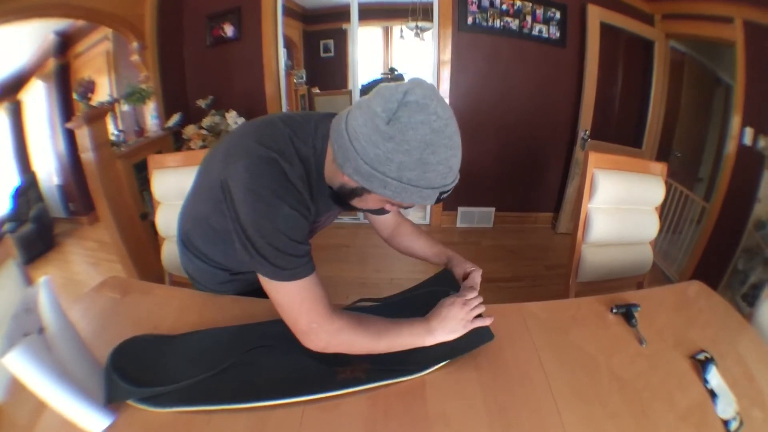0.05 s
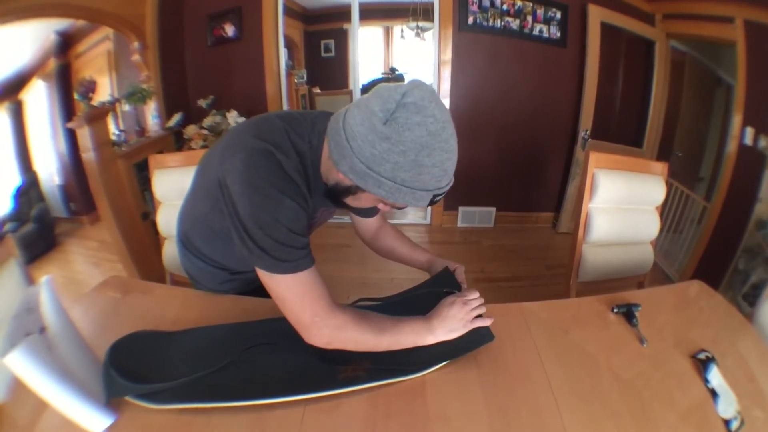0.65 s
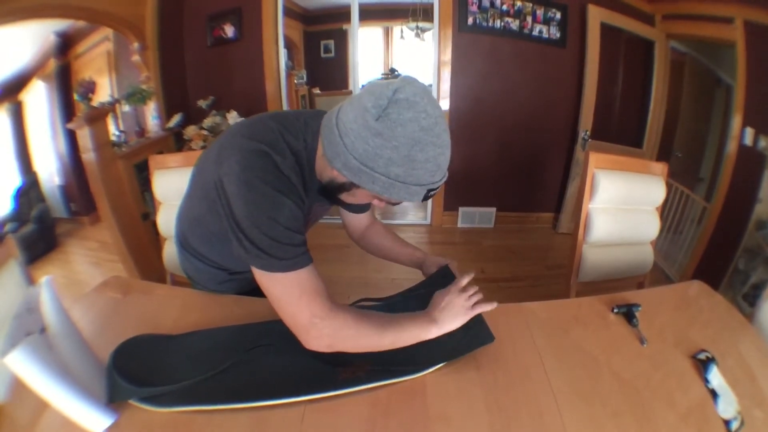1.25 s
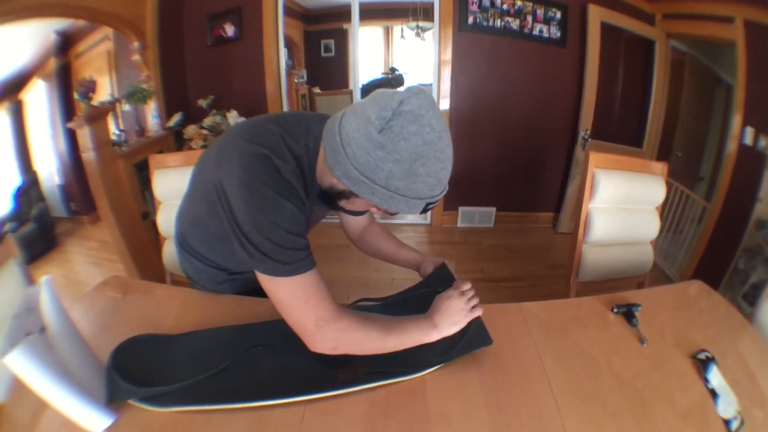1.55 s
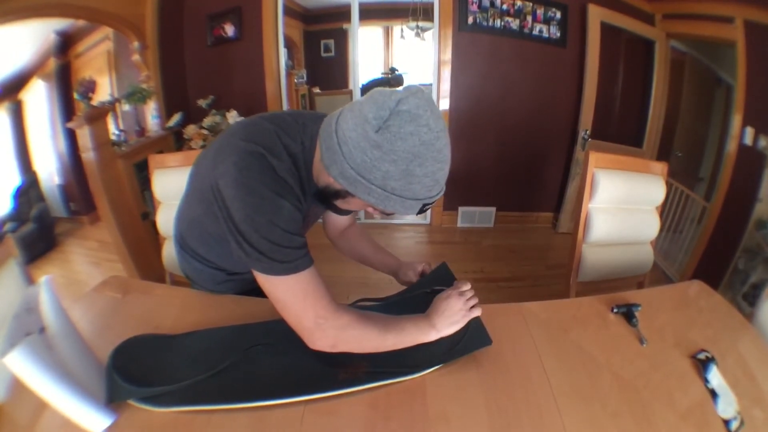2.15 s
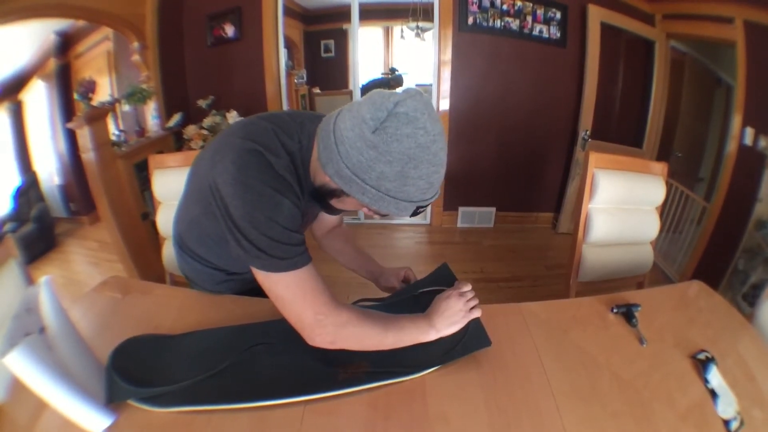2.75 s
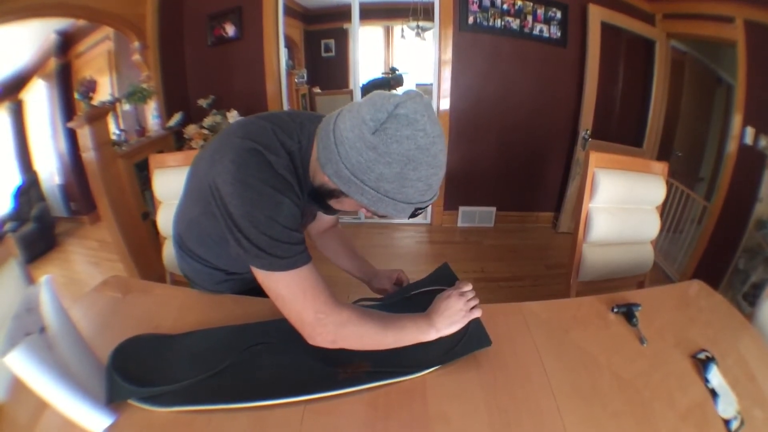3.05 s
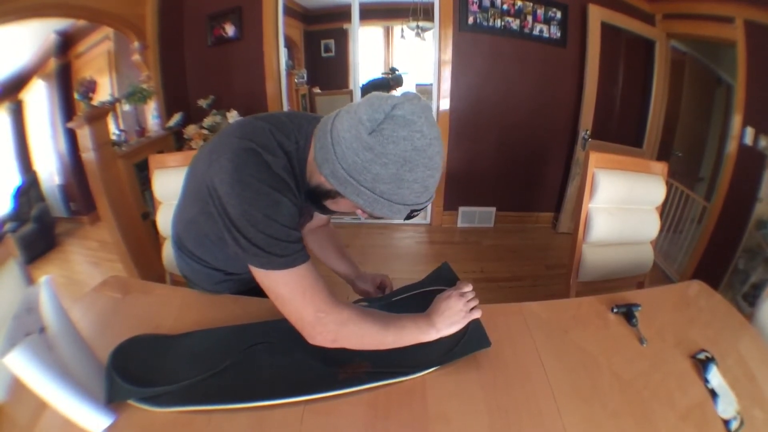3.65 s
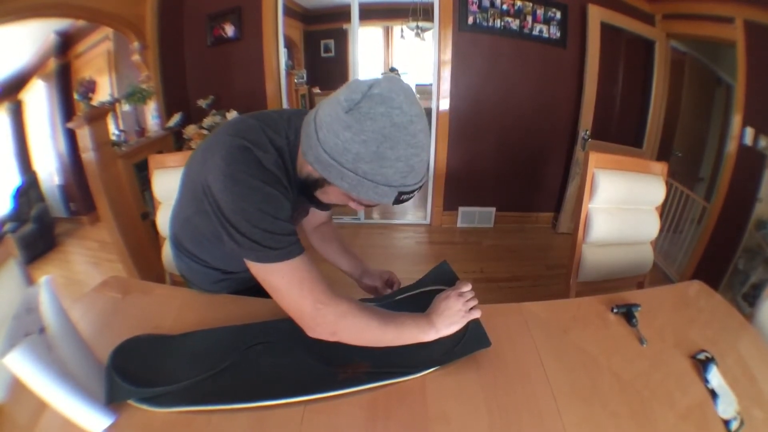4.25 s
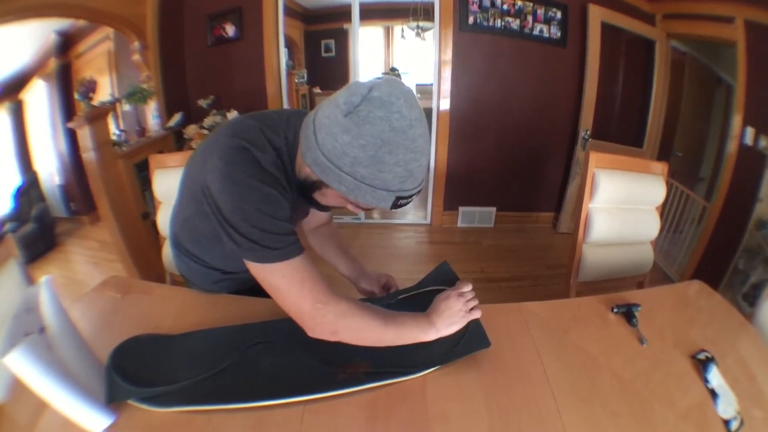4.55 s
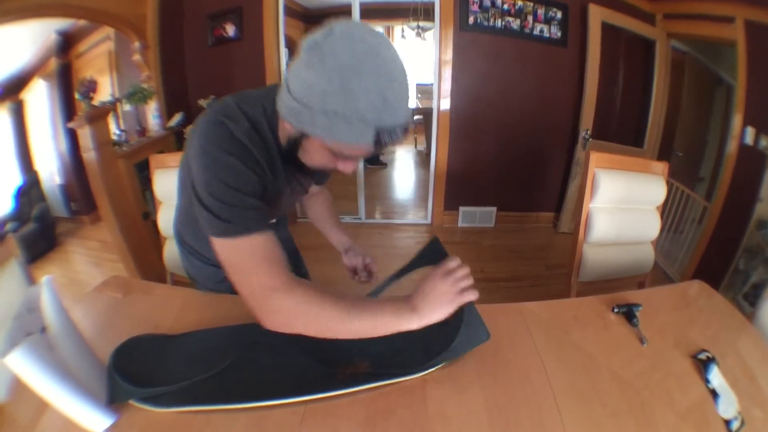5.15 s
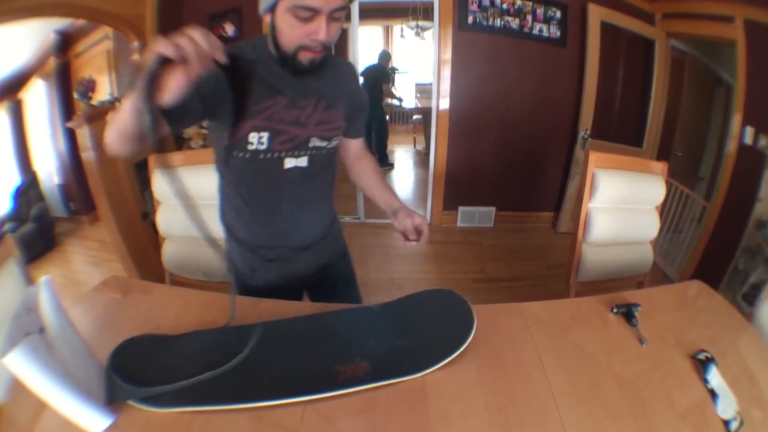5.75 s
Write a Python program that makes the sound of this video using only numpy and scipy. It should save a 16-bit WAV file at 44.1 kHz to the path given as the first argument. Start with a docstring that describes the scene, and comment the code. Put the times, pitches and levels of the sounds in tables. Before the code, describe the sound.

In a reverberant wooden room, a nearby microphone picks up the jerky, gritty rasp of a blade trimming tape from a skateboard. One loud, ringing knock of the board on the table interrupts early on. More scraping strokes follow, with light clicks as the blade catches. After a lull comes a short tear, then a few crisp snaps of the loose strip and soft bumps on the board, over faint hiss.

```python
"""Gritty clicks and a rasp: a utility blade saws the overhanging grip tape off a skateboard deck.
Grit fractures under the edge in stick-slip jerks and drives the deck into a hum. Once the deck tips
and knocks on the wooden table, and both ring in their modes; later, hands bump it softly.
The last of the tape rips, then the stiff offcut snaps free and flicks about.
A live wooden room reverberates, over a faint rumble and hiss."""
import sys
import numpy as np
from scipy import signal
from scipy.fft import rfft, irfft
from scipy.io import wavfile

SR = 44100
rng = np.random.default_rng(int(sys.argv[2]) if len(sys.argv) > 2 else 0)


def pcm_store(signal):
    """Save signal as 16-bit PCM."""
    levels = np.round(np.clip(np.atleast_2d(signal), -1, 1) * 32767)
    wavfile.write(sys.argv[1], SR, levels.astype(np.int16).T)


N = 260851
TIME = np.arange(N) / SR
SIZE = 4096  # samples in a click response

# spectra of breaking grit, hollow plywood and the tape's tick: (frequency [Hz], level [dB])
GRIT_SPECTRUM = [(700, -43.5), (1300, -12.5), (1650, 0), (1900, 2), (2250, -1.5), (2500, -6), (3100, -9.5),
                 (3700, -8.5), (4600, -30), (7000, -53), (15000, -63)]
PLYWOOD_SPECTRUM = [(300, -23.5), (720, -9), (900, -6.5), (1010, 3.5), (1220, 0), (1400, -4.5),
                    (1650, -5.5), (2500, -42.5)]
TICK_SPECTRUM = [(1000, -7.5), (3000, 0), (4500, -2), (6000, -7.5), (8000, -15), (12000, -20), (16000, -22)]
# resonances of blade and board: (frequency [Hz], level [dB], T60 [s])
EDGE_MODES = [(1017, -6.5, 0.08), (1374, -15, .09), (1958, 4, 0.072), (2198, -5.5, 0.27),
              (2640, -0.5, 0.025), (3866, -6, 0.027), (6340, -18.5, 0.018)]
# pushes of the blade; the last three levels are relative to the rasp:
# (start [s], duration [s], rasp [dB], change over the push [dB], bite [dB], plywood [dB], hum [dB])
PUSHES = [(0.171, 0.072, -57, -4, -6.5, -3.5, 0), (0.283, 0.22, -59.5, -6.5, -10.5, -4, -2),
          (0.509, 0.175, -54.5, 0, -3, -1, -1), (0.702, 0.097, -57.5, -5, -14, 1, -0.5),
          (0.844, 0.27, -59.5, 0, -9, -1, -3.5), (1.591, 0.19, -51.5, 4.5, -6, -6.5, -13.5),
          (1.801, 0.15, -54, -14, -9, -11, -6), (1.931, 0.294, -48.5, -1.5, -10, -12, -17),
          (2.229, 0.22, -49.5, 5, -13, -12, -12.5), (2.47, 0.12, -61.5, -4, -5.5, -11.5, -9),
          (2.605, 0.25, -50, 2, -12.5, -9.5, -12), (2.874, 0.15, -58.5, 13, -10, -14, -17),
          (3.014, 0.15, -47, 0, -8.5, -10, -8), (3.322, 0.14, -49, -3, -10, -10, -15.5),
          (3.461, 0.24, -52.5, 0.5, -15, -20.5, -14), (3.65, 0.17, -54.5, 12, -2, -13.5, -8),
          (4.407, 0.13, -60.5, -5, -8.5, -7, -16)]


def amp(db):
    """Amplitude ratio: a factor of ten per 20 dB."""
    return 10 ** (np.asarray(db) / 20)


def unit(x):
    """Normalisation to an rms of 1."""
    return x / np.sqrt(np.mean(x ** 2))


def through(x, response):
    """Convolution: a linear system answers each sample with its impulse response."""
    return signal.fftconvolve(x, response)[:N]


def on_log(hz, points):
    """Interpolation of (frequency [Hz], value) points on a logarithmic frequency axis."""
    frequencies, values = np.transpose(points)
    return np.interp(np.log(hz + 1), np.log(frequencies), values)


def pulse(spectrum, lag_s=0):
    """Dispersion of a click (peak 1): bending waves carry treble fastest; 1 kHz is delayed by lag_s."""
    hz = np.fft.rfftfreq(SIZE, 1 / SR)
    cepstrum = irfft(np.log(amp(on_log(hz, spectrum))))
    cepstrum[1:SIZE // 2] *= 2  # folding the cepstrum gives minimum phase
    cepstrum[SIZE // 2 + 1:] = 0
    bending_phase = 4 * np.pi * lag_s * np.sqrt(1000 * hz)
    click = irfft(np.exp(rfft(cepstrum) - 1j * bending_phase))
    return click / np.abs(click).max()


def ring(modes):
    """Modal superposition: one second of damped sines of alternating sign."""
    t = TIME[:SR]
    return sum((-1) ** k * amp(db) * np.sin(2 * np.pi * hz * t) * np.exp(-np.log(1000) * t / t60)
               for k, (hz, db, t60) in enumerate(modes))


def ringing(spectrum, modes, ring_db):
    """Impact response: a click plus free vibration, whose energy is ring_db relative to the click."""
    click = np.pad(pulse(spectrum), (0, SR - SIZE))
    tone = ring(modes)
    return click + amp(ring_db) * tone * np.sqrt(np.sum(click ** 2) / np.sum(tone ** 2))


def impulses(table, column=1):
    """Ideal impacts: one impulse at each row's time, at the level [dB] in the chosen column."""
    rows, train = np.array(table), np.zeros(N)
    samples = np.clip(np.round(rows[:, 0] * SR).astype(int), 0, N - 1)
    np.add.at(train, samples, amp(rows[:, column]))
    return train


def pitched_clicks(rows, spectrum, lag_s):
    """Frequency scaling: one spectrum, shifted for each (time [s], level [dB], pitch [Hz])."""
    return sum(through(impulses([(s, db)]), pulse([(hz * k, gain) for k, gain in spectrum], lag_s))
               for s, db, hz in rows)


def crumble(x, decay_s, tail_db):
    """Crumbling contact: a decaying noise burst follows each impulse."""
    fade = np.exp(-TIME[:SIZE] / decay_s)
    envelope = through(x, fade / np.sqrt(np.sum(fade ** 2)))
    return x + amp(tail_db) * envelope * rng.standard_normal(N)


def grit(per_s, spread_db):
    """Brittle fracture as a Poisson process: grains break independently, at scattered levels."""
    breaks = rng.random(N) < per_s / SR
    sizes = np.minimum(rng.exponential(size=N), 4)
    return breaks * amp(spread_db * sizes) * rng.choice([-1, 1], N)


def room(x, wet_db):
    """Reverberation: direct sound plus a diffuse tail whose treble dies first."""
    decay_times = [(100, 0.67), (400, 0.64), (2000, 0.53), (4000, 0.49), (8000, 0.24), (15000, 0.33)]  # (frequency [Hz], T60 [s])
    t, hz = TIME[:SR], np.fft.rfftfreq(SR, 1 / SR)
    noise = rfft(rng.standard_normal(SR))
    centres = np.geomspace(100, 16000, 9)
    tail = 0
    for centre, weights in zip(centres, np.eye(len(centres))):
        band = irfft(noise * on_log(hz, np.c_[centres, weights]), SR)
        tail += band * np.exp(-np.log(1000) * t / on_log(centre, decay_times))
    tail *= 1 - np.exp(-(t / 0.0012) ** 2)  # reflections build up
    return x + amp(wet_db) * through(x, tail / np.sqrt(np.sum(tail ** 2)))


def background():
    """Stationary filtered noise: faint room rumble and hiss."""
    spectrum = [(20, -26.5), (43, -5), (110, -3), (170, -10.5), (260, -7.5), (400, -11), (520, -19),
                (1000, -19.5), (2200, -21), (3500, -19.5), (5000, -27.5), (8300, -30), (10500, -34),
                (15500, -34.5)]  # (frequency [Hz], level [dB])
    return amp(-66) * unit(through(rng.standard_normal(N), pulse(spectrum)))


def catches(slip_clicks, slip_chips):
    """Elastic release: the blade jumps off a coarse grain, blade and plywood click, a chip breaks off."""
    hard_catches = [(0.02, -36, -2), (0.18, -36.5, -18), (0.2921, -34.5, -14), (0.4959, -38.5, -3),
                    (0.525, -39, 2), (0.5467, -32.5, 0), (0.570, -35, -1), (0.597, -35.5, -2),
                    (0.6162, -39, 8), (0.638, -33, -18), (0.77, -37.5, -9), (0.961, -33.5, -11),
                    (0.988, -39, -13), (1.423, -30.5, -9), (1.7174, -29.5, -2), (1.868, -35, -7),
                    (1.909, -34, -3), (2.059, -35, -13), (2.134, -28.5, -12), (2.212, -29.5, -14),
                    (2.836, -32.5, -15), (3.547, -36.5, -6), (3.685, -31, -5), (3.743, -41, -14),
                    (3.805, -60, 19), (4.158, -41, -9.5), (4.4387, -37.5, -12), (4.659, -49, 0)]  # (time [s], click level [dB], chip relative to click [dB])
    chip_spectrum = [(1000, -40), (2800, -17), (3900, 2), (4600, 6.5), (5400, 1), (6400, -2.5),
                     (7400, -27.5), (10000, -28), (15000, -47.5)]  # (frequency [Hz], level [dB])
    body = ringing(GRIT_SPECTRUM, EDGE_MODES, ring_db=-8)
    body[:SIZE] += amp(-11) * pulse(PLYWOOD_SPECTRUM, lag_s=0.00051)
    clicks = slip_clicks + impulses(hard_catches)
    chips = slip_chips + impulses([(s, db + chip_db) for s, db, chip_db in hard_catches])
    clicks, chips = (amp(-4.5) * crumble(x, decay_s=0.003, tail_db=-1) for x in (clicks, chips))
    chipping = through(chips, pulse(chip_spectrum, lag_s=0.00074))
    return room(through(clicks, body), wet_db=-4) + room(chipping, wet_db=-6.5)


def push(start, length, change_db=0):
    """Amplitude envelope of a push: a graze, a quick attack, a hold that swells or sags, a release."""
    graze_s, attack_s, release_s = 0.0073, 0.004, 0.006
    age = TIME - start
    graze = amp(-4) * np.exp(np.minimum(age, 0) / graze_s)
    grip = np.maximum(np.clip(age / attack_s, 0, 1), graze)
    hold = amp(change_db * (np.clip(age / length, 0, 1) - 0.5))
    return grip * hold * np.exp(-np.maximum(age - length, 0) / release_s)


def stick_slip():
    """Stick-slip friction: uneven jerks bunch the grains; returns that envelope and an impulse a jerk."""
    # jerky at first, smoother round the corner: (time [s], stick-slip share [0-1])
    jerkiness = [(0.4, .2), (0.55, .55), (1.0, .8), (1.7, .45), (2.15, .42), (2.4, .12)]
    slips_per_s, log_scatter, scatter_db, decay_s = 54, 0.2, 1.5, 0.004
    spacing, size = rng.standard_normal((SIZE, 2)).T
    starts = np.r_[0, np.cumsum(np.exp(log_scatter * spacing[1:]) / slips_per_s)]
    age = TIME - starts[np.searchsorted(starts, TIME, side="right") - 1]
    share = np.interp(TIME, *np.transpose(jerkiness))
    bunching = np.sqrt(1 - share + share * unit(np.exp(-age / decay_s)) ** 2)
    slips = np.c_[starts, scatter_db * size][starts < TIME[-1]]
    return bunching, share * impulses(slips)


def slack_rasp(grains):
    """Resonance: grains ring blade and board, whose modes the changing grip detunes at each push."""
    detunings = np.exp(0.04 * rng.standard_normal((len(PUSHES), len(EDGE_MODES))))
    rasp = 0
    for (start, length, db, change_db, *_), ratios in zip(PUSHES, detunings):
        modes = [(hz * k, gain, t60) for (hz, gain, t60), k in zip(EDGE_MODES, ratios)]
        response = ringing(GRIT_SPECTRUM, modes, ring_db=-2)
        rasp += amp(db) * push(start, length, change_db) * unit(through(grains, response))
    return rasp


def blade():
    """Forced vibration: grit cracking under the edge drives blade, tape and deck."""
    # treble bite, humming deck and taut tape: (frequency [Hz], level [dB])
    bite_spectrum = [(1000, -49.5), (2800, -22), (4000, 12), (4500, 2.5), (5000, -2.5), (6300, -7.5),
                     (7500, -32), (10000, -30.5), (15000, -47.5)]
    deck_spectrum = [(30, -35), (60, -15), (112, 1.5), (146, -4), (240, -5), (290, -8.5), (350, -3.5),
                     (450, -9), (700, -25.5), (1500, -54)]
    taut_spectrum = [(800, -39), (1400, -13), (1650, -23.5), (2000, -9.5), (2280, 2), (2550, 2.5),
                     (2800, -12), (3400, -1.5), (3900, -6), (4600, -17), (5100, -42), (7000, -45.5),
                     (15000, -60.5)]
    # round the corner the tape is held shorter and rasps higher: (time [s], taut share before clipping)
    tautness = [(0.4, -1.07), (1.9, -0.53), (2.25, 0.4), (3.3, 0.38), (4.5, 1.32)]
    rasp_gain, bite_gain, plywood_gain, hum_gain = sum(
        np.outer(amp([db, db + bite_db, db + plywood_db, db + hum_db]), push(start, length, change_db))
        for start, length, db, change_db, bite_db, plywood_db, hum_db in PUSHES)
    bunching, jerks = stick_slip()
    grains = bunching * crumble(grit(per_s=1250, spread_db=0.5), decay_s=0.0036, tail_db=-2)
    taut = np.clip(np.interp(TIME, *np.transpose(tautness)), 0, 1)
    taut_rasp = rasp_gain * unit(through(grains, pulse(taut_spectrum, lag_s=0.001494)))
    rasp = np.sqrt(1 - taut) * slack_rasp(grains) + np.sqrt(taut) * taut_rasp
    bite = amp(-2) * bite_gain * unit(through(grains, pulse(bite_spectrum)))
    plywood = plywood_gain * unit(through(grains, pulse(PLYWOOD_SPECTRUM, lag_s=0.001021)))
    hum = hum_gain * unit(through(grains, pulse(deck_spectrum)))
    sawing = room(rasp + bite + plywood + hum, wet_db=-4.5)
    return sawing + catches(amp(14.5) * rasp_gain * jerks, amp(19) * bite_gain * jerks)


def knock():
    """Impact of wood on wood: a contact crack, a blow dispersing through the table, then modal decay."""
    # the deck strikes and rattles to rest: (time [s], blow [dB], ring [dB], crack [dB])
    strikes = [(1.1243, -6.5, -25, -4.5), (1.1405, -26.5, -49.5, -30), (1.1768, -17, -28.5, -14),
               (1.2115, -16.5, -34.5, -40)]
    # contact crack and blow in the table top: (frequency [Hz], level [dB])
    crack_spectrum = [(300, -27.5), (650, 2.5), (1700, -17), (2100, 3), (2900, -4.5), (4200, -12),
                      (5000, -19.5), (7000, -34.5), (10000, -48), (15000, -60.5)]
    blow_spectrum = [(30, -23), (65, -11), (130, -2.5), (220, 0), (380, -2), (480, -6), (680, -4),
                     (830, -7.5), (1000, 2), (1500, -5.5), (2250, -3.5), (2550, -6), (3300, -7.5),
                     (4300, -17), (5000, -28.5), (7000, -48.5), (10000, -60), (15000, -71.5)]
    wood_modes = [(128.5, -2, 0.75), (173.9, -6, 0.49), (227.5, 3.5, 0.31), (253.6, -2, 0.46),
                  (284.6, -15.5, 0.65), (349.4, 6, 0.52), (380, -0.5, 0.35), (420.6, -8, 0.4),
                  (576.5, -12, 0.24), (689, -6.5, 0.31), (954, -5.5, 0.6), (978, -1, 0.16),
                  (1125, -5.5, 0.26), (1160, -12, 0.62), (1240, -9.5, 0.46), (1374, -8, 0.48),
                  (1464, -10, .45), (1439, -13.5, 0.36), (1677, -10, .5), (1635, -12, 0.83),
                  (2060, -3.5, .45), (2050, -2.5, 0.16), (2222, -13, 0.46), (2340, -18, 0.18),
                  (2718, -30.5, 0.57), (2930, -18, 0.46)]  # deck and table together: (frequency [Hz], level [dB], T60 [s])
    crack = through(impulses(strikes, column=3), pulse(crack_spectrum, lag_s=0.0033))
    blow = through(impulses(strikes, column=1), pulse(blow_spectrum, lag_s=0.002013))
    wood = through(impulses(strikes, column=2), ring(wood_modes))
    return amp(-0.5) * crack + amp(-7) * room(blow, wet_db=11.5) + amp(-4.15) * wood


def hand_bumps():
    """Soft contact excites mainly low frequencies: hands press and leave the deck."""
    contacts = [(3.028, -48, 112), (3.148, -47, 109), (3.339, -47, 107.4), (3.397, -44, 109.7),
                (5.746, -36.5, 206), (5.772, -37.5, 172)]  # (time [s], level [dB], pitch [Hz])
    spectrum = [(.2, -68), (.55, -13.5), (1, 6), (1.5, -11), (2.2, -24), (4, -22.5), (9, -52)]  # (frequency [multiple of pitch], level [dB])
    return room(pitched_clicks(contacts, spectrum, lag_s=0.0016), wet_db=-9.5)


def surge(peak_s, build_s, fall_s):
    """Loading and relaxation: an envelope that grows and decays exponentially."""
    return np.exp(-np.maximum((peak_s - TIME) / build_s, (TIME - peak_s) / fall_s))


def rip():
    """Tensile fracture: the last tape parts in a run of grains; the blade squeaks as it slides out."""
    tugs = [(4.688, -50, 0.014), (4.7146, -35, 0.0014), (4.753, -30, 0.013)]  # (peak time [s], level [dB], build-up [s])
    first_fibre = [(4.713, -35)]  # parts with a tick: (time [s], level [dB])
    # tearing tape and squeaking blade: (frequency [Hz], level [dB])
    tear_spectrum = [(35, -64.5), (60, -26), (91, -5.5), (151, -13), (347, -12.5), (399, -20.5), (663, -18),
                     (855, -18), (1010, -8), (1360, -14), (2200, -2), (3500, -5), (4400, -7.5), (5300, -14),
                     (6400, -25), (15000, -59)]
    squeak_spectrum = [(1000, -41.5), (2130, -23.5), (2260, -3), (2400, -16), (5000, -55)]
    grains = grit(per_s=2200, spread_db=-0.5)
    strain = sum(amp(db) * surge(s, build_s, fall_s=0.014) for s, db, build_s in tugs)
    tear = strain * unit(through(grains, pulse(tear_spectrum)))
    tick = through(impulses(first_fibre), pulse(TICK_SPECTRUM, lag_s=0.00102))
    squeak = amp(-60) * push(start=4.945, length=0.081) * unit(through(grains, pulse(squeak_spectrum)))
    return room(tear + tick, wet_db=-3) + room(squeak, wet_db=-14)


def offcut():
    """Release of strain energy: the stiff strip drags over grit, then whips free and thuds the deck."""
    drags = [(5.347, -44.5), (5.657, -46)]  # (peak time [s], level [dB])
    flicks = [(5.3473, -6, -24.5, -46, 2223), (5.6569, -17, -25, -46.5, 2090),
              (5.6752, -29, -34, -73, 2380), (5.7810, -16, -25, -53.5, 2120),
              (5.7930, -18.5, -27, -56, 2360), (5.8721, -18, -31.5, -55, 2190),
              (5.886, -23.5, -29, -55, 2310)]  # (time [s], snap [dB], tick [dB], thud [dB], pitch of the strip [Hz])
    snap_spectrum = [(.015, -59), (.05, -12), (.2, -26.5), (.38, -34.5), (.51, -11.5), (.63, -19),
                     (.74, -20), (.86, -17.5), (1, 2.5), (1.15, -11.5), (1.27, -8), (1.36, -14.5),
                     (1.47, -7), (1.9, -26), (2.7, -32), (3.6, -34.5), (6.8, -67.5)]  # (frequency [multiple of pitch], level [dB])
    flap_spectrum = [(200, -8), (700, -20.5), (1100, -6), (1600, 2), (2300, -1.5), (3400, -2), (4000, -7.5),
                     (6000, -20.5), (15000, -48)]  # crackle of the whole strip: (frequency [Hz], level [dB])
    deck_modes = [(79, -10, 1), (119, 1, 1), (176, -6.5, 0.69), (234.6, -2, 0.32), (362, -12, 0.86),
                  (479, -9, 0.51), (697, -14, 0.37), (1154, 7, 0.085), (1640, -8, 0.44)]  # (frequency [Hz], level [dB], T60 [s])
    strain = sum(amp(db) * surge(s, build_s=0.0082, fall_s=0.0093) for s, db in drags)
    drag = strain * unit(through(grit(per_s=2000, spread_db=3), pulse(GRIT_SPECTRUM)))
    snaps = pitched_clicks([(s, db, hz) for s, db, _, _, hz in flicks], snap_spectrum, lag_s=0.002373)
    bursts = crumble(impulses(flicks, column=2), decay_s=0.0014, tail_db=8.5)
    ticks = through(bursts, pulse(TICK_SPECTRUM, lag_s=0.001972))
    flap = through(impulses(flicks, column=1), pulse(flap_spectrum, lag_s=0.00198))
    thud = through(impulses(flicks, column=3), ring(deck_modes))
    return (room(drag + amp(-3.5) * snaps, wet_db=-12) + room(amp(-8.5) * ticks, wet_db=0.5)
            + room(amp(-18) * flap, wet_db=6) + thud)


def scene():
    """Superposition: the pressures of all sources add in one channel."""
    return (background() + blade() + knock() + hand_bumps() + rip() + offcut())[None]


def record(dry):
    """Band limiting: a steep elliptic low-pass at 16 kHz."""
    return signal.sosfilt(signal.ellip(8, 0.2, 70, 16000, fs=SR, output="sos"), dry)


dry = scene()
out = record(dry)
pcm_store(out)
```